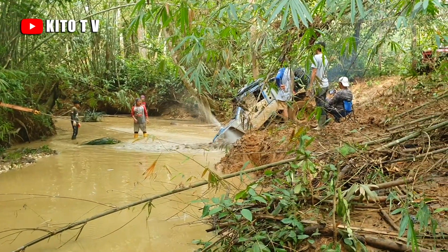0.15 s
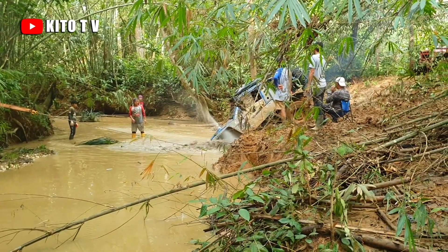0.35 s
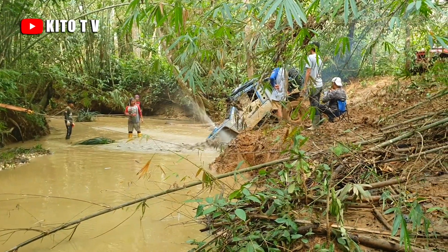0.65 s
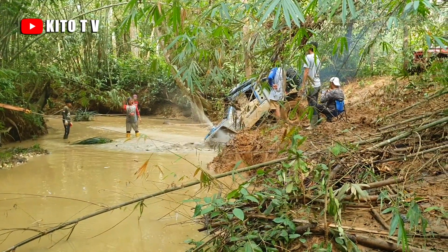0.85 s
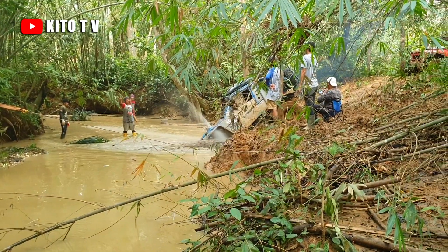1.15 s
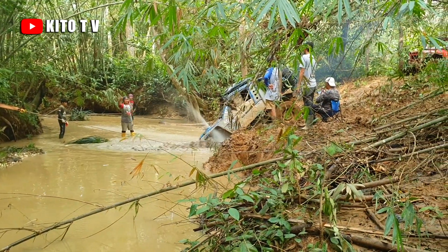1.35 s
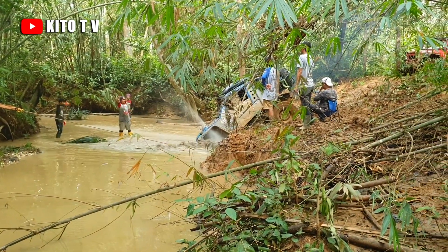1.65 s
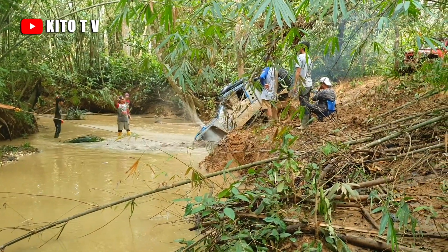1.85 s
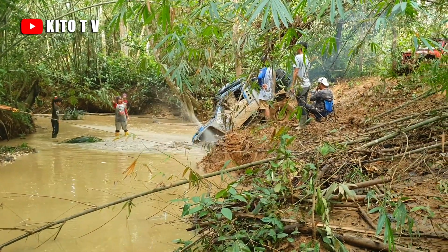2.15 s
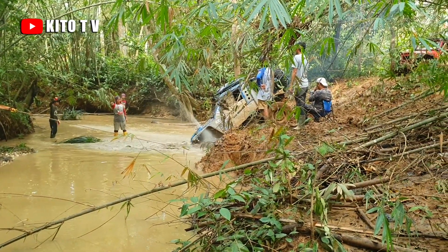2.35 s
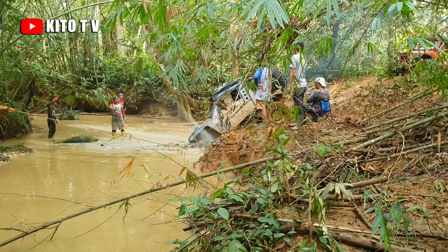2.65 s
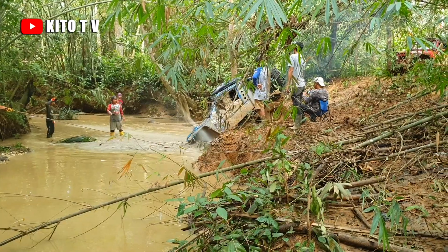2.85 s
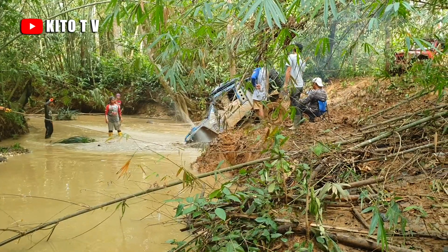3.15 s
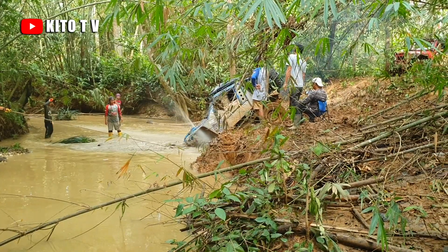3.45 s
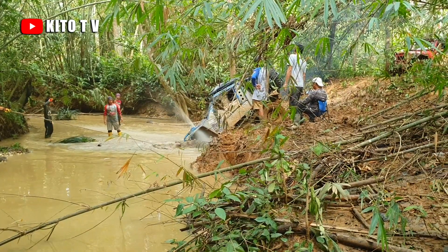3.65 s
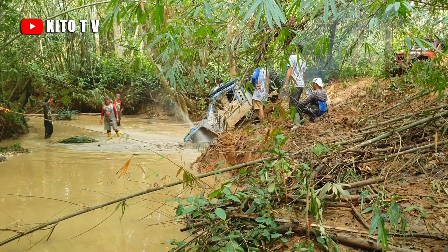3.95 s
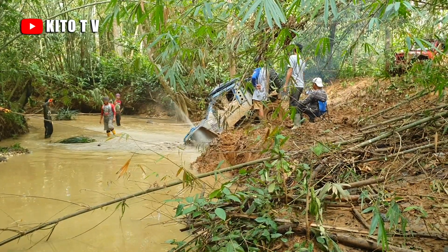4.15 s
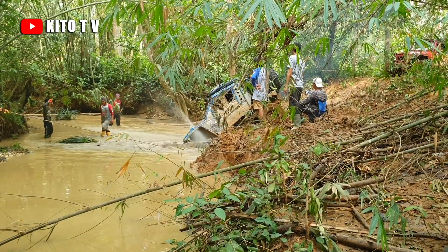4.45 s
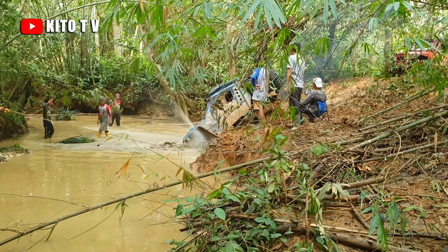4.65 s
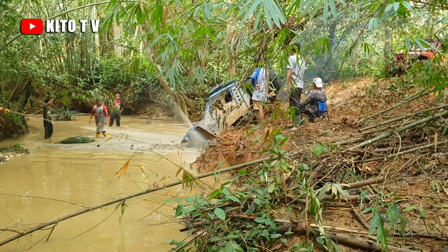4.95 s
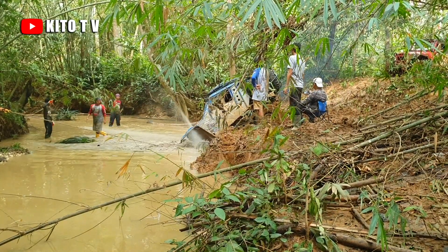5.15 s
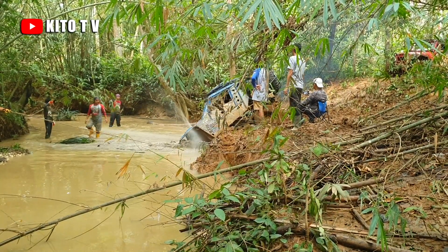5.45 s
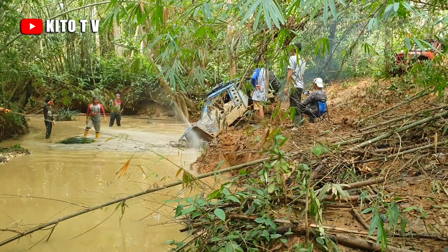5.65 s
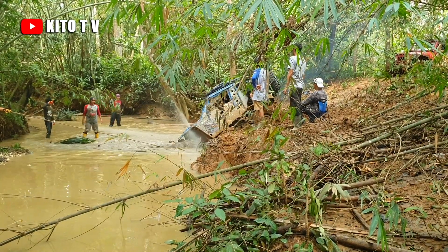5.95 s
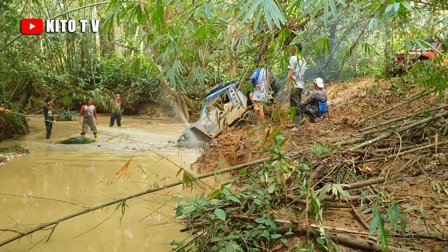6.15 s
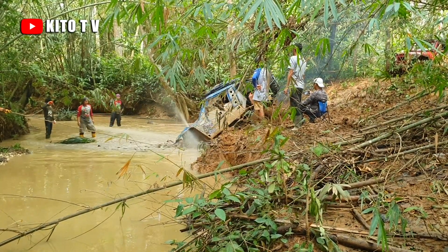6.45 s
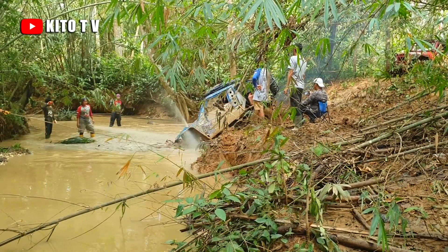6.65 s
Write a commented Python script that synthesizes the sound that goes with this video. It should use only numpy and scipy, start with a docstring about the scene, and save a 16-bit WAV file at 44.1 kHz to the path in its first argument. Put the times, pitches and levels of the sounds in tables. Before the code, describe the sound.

An off-road truck labours on a muddy bank about twenty metres from a stereo microphone. Its deep exhaust drone starts high, sags to a lumpy, weaker low, then surges back under throttle, dips again and finally climbs. Rough gas and intake roar accompanies it, with wheel-thrown water hissing and ticking, and thin steady insect buzz in the forest.

```python
"""Off-road truck climbing a muddy river bank

A four-cylinder truck labours up the bank in a forest, some twenty metres from a stereo camera.
The exhaust booms in clean orders (multiples) of the firing rate; uneven cylinders add quarter and half orders.
Gas and intake noise roars with the throttle, churned water hisses and ticks as it sprays back into the river,
and a steady band of noise makes the insect buzz behind it all."""
import sys
import numpy as np
from scipy import signal
from scipy.fft import rfft, irfft
from scipy.io import wavfile
from scipy.ndimage import uniform_filter1d

SR = 44100
rng = np.random.default_rng(int(sys.argv[2]) if len(sys.argv) > 2 else 0)


def wrap_up_sound(samples):
    """Save the sound to the file named by the first command line argument, as 16-bit audio."""
    columns = np.atleast_2d(samples).T
    # keep every value between -1 and 1, then stretch to whole-number steps
    tamed = np.clip(columns, -1, 1)
    steps = np.round(tamed * 32767).astype(np.int16)
    wavfile.write(sys.argv[1], SR, steps)


N = 299880

# A steady pull, from which load and spray are reckoned: first order [dB], roar [dB], firing rate [Hz]
PULL_BOOM_DB, PULL_ROAR_DB, PULL_HZ = -15, -33, 90


def undb(db):
    """Gain of a dB value."""
    return 10 ** (np.asarray(db) / 20)


def colour(table, hz):
    """Value of a (Hz, value) table, straight on a log-frequency axis."""
    f, value = np.transpose(table)
    return np.interp(np.log(hz), np.log(f), value)


def walk(rate):
    """Random levels held 1 / rate s, then slewed by two moving averages; spread near 1."""
    step = 64  # samples per coarse point
    hold = int(SR / step / rate)
    coarse = np.repeat(rng.standard_normal(N // step // hold + 2), hold)
    coarse = uniform_filter1d(uniform_filter1d(coarse, hold), hold)
    return 2.47 * np.interp(np.arange(N), step * np.arange(len(coarse)), coarse)


def ports(mid, side, hz):
    """Left and right microphone ports from mid and side, with width and tilt set by pitch."""
    # Stereo width: (frequency [Hz], side minus mid [dB])
    width = [(60, -21), (110, -22), (200, -24), (380, -13), (700, -7), (1290, -1), (2380, -1), (4400, -1),
             (8120, -1), (15000, 1)]
    # Stereo balance: (frequency [Hz], left minus right [dB])
    tilt = [(60, 1.5), (110, -2), (200, 0), (380, 2), (700, -1.5), (1290, 0.5), (2380, -0.5), (4400, -3.5),
            (8120, -2.5), (15000, -0.5)]
    sign = np.array([[1], [-1]])
    spread = mid + sign * undb(colour(width, hz)) * side
    return spread * undb(sign * colour(tilt, hz) / 2)


def noise(table, ref_hz, swell_db, flicker_db):
    """Half-octave bands of wide noise that swell together and flicker alone; 0 dB over the reference range."""
    f = np.maximum(np.fft.rfftfreq(N, 1 / SR), 1)
    shape = undb(colour(table, f))
    in_reference = (f > ref_hz[0]) & (f < ref_hz[1])
    shape = shape / np.sqrt(np.sum(shape[in_reference] ** 2) * 2 / N)
    mid, side = rfft(rng.standard_normal((2, N))) * shape
    out, swell = 0, swell_db * walk(7)
    low, high = np.log2([table[0][0], table[-1][0]])
    for octave in np.arange(low - 1, high + .5, .5):
        # neighbouring bands cross-fade and add up to one
        share = np.cos(np.pi * np.clip(np.log2(f) - octave, -.5, .5)) ** 2
        band = ports(irfft(mid * share, N), irfft(side * share, N), 2 ** octave)
        out = out + band * undb(swell + flicker_db * walk(6.3))
    return out


def insects():
    """Forest buzz: many small voices merge into a steady narrow band of noise."""
    # Buzz spectrum: (frequency [Hz], relative density [dB per Hz])
    buzz = [(2300, -30), (2550, 9), (2800, 1), (3150, -12), (3500, -39)]
    return undb(-52.5) * noise(buzz, (2300, 3500), swell_db=0.5, flicker_db=0.1)


def spray(hz, throttle):
    """Water thrown by the wheels: a hiss with fine drops on top, more under load and at low revs."""
    # Water hiss: (frequency [Hz], relative density [dB per Hz])
    hiss_spectrum = [(300, -12), (1000, 1.5), (1900, -4), (2800, 2.5), (4000, -3.5), (6500, -4.5),
                     (8000, -12), (12000, -12), (15500, -22.5)]
    level_db = -40 + 0.47 * throttle - 0.13 * (hz - PULL_HZ)
    hiss = noise(hiss_spectrum, (1200, 12000), swell_db=0.42, flicker_db=1.1)
    falls = rng.random((2, N)) < 300 / SR  # about 300 drops a second at each port
    drops = falls * undb(np.minimum(3.5 * rng.exponential(size=(2, N)), 12))
    drop_band = signal.butter(2, [6000, 15500], "bandpass", fs=SR, output="sos")
    ticks = signal.sosfilt(drop_band, drops)
    return undb(level_db) * (hiss + undb(8.5) * ticks)


def roar(cycle, db):
    """Gas and intake noise, puffing faintly once a firing and with a slower puff every other firing."""
    # Gas and intake noise: (frequency [Hz], relative density [dB per Hz])
    gas = [(30, -1), (60, 11), (100, 14), (200, 5), (350, 5.5), (520, 5.5), (750, 3), (950, 2), (1200, 0),
           (1700, -0.5), (2200, -5), (4500, -10.5), (7000, -17.5), (15000, -31)]
    puff = 1 + .12 * np.cos(cycle) + .09 * np.cos(cycle / 2)
    return undb(db) * puff * noise(gas, (500, 2400), swell_db=0.1, flicker_db=0.36)


def silencer_db(hz):
    """What the silencer lets through above the first order, with its peaks and notches."""
    # Silencer response: (frequency [Hz], gain [dB])
    response = [(114, -14), (128, 2.5), (138, 7.5), (150, -5), (162, -5), (171, 1.5), (181, 0.5),
                (190, -4.5), (199, -7.5), (208, 1), (216, 6.5), (225, -0.5), (233, 2), (242, -14), (251, 1),
                (260, 2.5), (266, -4), (268.6, -14.5), (271.5, -4), (284, -5.5), (300, 5), (315, 5),
                (332, -3.5), (348, 1.5), (362, -3), (374, 1), (385, -4), (400, 1), (416, -2), (432, -4.5),
                (450, 2.5), (473, -10.5), (520, -24)]
    return colour(response, hz)


def order(k, cycle, hz, db, waver, far_db, rate=9):
    """One engine order; it reaches the two ports a little apart in time, by a lag that drifts."""
    # Lean of each exhaust pulse, which flips as the firing rate passes a pipe mode:
    # (firing rate [Hz], phase [rad])
    skew = [(76, .2), (86, .5), (90, 1.0), (94, .8), (98, -.3), (103, -.85)]
    angle = k * cycle + np.pi + colour(skew, hz) + waver * walk(rate)
    apart = undb(far_db) * np.sin(angle + 0.25 * k * walk(1.124))
    return np.sqrt(2) * undb(db) * ports(np.cos(angle), apart, k * np.mean(hz))


def upper_orders(hz, boom, throttle, rise):
    """Levels of orders 2 to 5, which follow boom, throttle and rising revs through the silencer."""
    # Upper orders: (order, level on a steady pull before the silencer [dB], per first order [dB per dB],
    # per throttle [dB per dB], per rising revs [dB per Hz/s])
    upper = [(2, -19, 1.28, 0.4, 0.0436), (3, -29, 0.17, 0.33, 0.0972), (4, -32.5, 0.37, 0.4, 0.257),
             (5, -40, 0.6, 1.3, 0.0731)]
    # An order briefly fades or swells: (time [s], order, half length [s], change [dB])
    fades = [(0.664, 4, 0.13, -10), (1.72, 4, .08, -9), (2.33, 2, 0.079, -14), (2.34, 4, 0.11, -17),
             (2.42, 3, 0.047, -6), (3.0, 4, 0.072, -6), (3.621, 5, .12, -11), (4.797, 4, 0.14, -3),
             (5.55, 5, 0.22, -5), (5.6, 4, .08, -7), (5.9, 4, .05, -7), (6.13, 4, 0.11, 6)]
    t = np.arange(N) / SR
    levels = []
    for k, db, per_boom, per_throttle, per_rise in upper:
        level = db + per_boom * boom + per_throttle * throttle + per_rise * rise
        for at, which, half, change in fades:
            if round(which) == round(k):
                level = level + change * np.exp(-((t - at) / half) ** 2)
        levels.append(level + silencer_db(round(k) * hz))
    return levels


def exhaust(cycle, hz, main_db, quarter_db, half_db, ring_db):
    """Clean firing orders, the lope of unequal cylinders, and high orders that sound where they meet a pipe mode."""
    # Quarter orders: (order, level over the lope [dB])
    quarters = [(.25, -27), (.75, -5), (1.25, -4.5), (1.75, -30), (2.25, -5), (2.75, -11.5), (3.25, -11.5),
                (3.75, -9)]
    # Half orders: (order, level over their drive, before the silencer [dB])
    halves = [(.5, -18), (1.5, -4), (2.5, -3), (3.5, -12), (4.5, -12), (5.5, -10)]
    # Upper exhaust modes: (frequency [Hz], width [Hz], level over the drive [dB])
    pipe = [(525.8, 16.1, -10), (586.9, 37, -6.5), (718, 34, -6), (779, 49, -18), (851, 20, -9),
            (1136, 180, -11.5), (1424, 120, -14)]
    out = 0
    for k, db in enumerate(main_db, start=1):
        out = out + order(k, cycle, hz, db + .25 * k * walk(14), .045 * k, -3.)
    for k, db in quarters:
        out = out + order(k, cycle, hz, quarter_db + db + 2.5 * walk(8), 1.1, -2)
    for k, db in halves:
        level = half_db + db + silencer_db(k * hz) + 1.3 * walk(6)
        out = out + order(k, cycle, hz, level, .6, 8.)
    for k in range(6, 18):
        ring = sum(undb(db) / (1 + (2 * (k * hz - f) / w) ** 2) for f, w, db in pipe)
        smear = (k / 14) ** 2  # firing jitter blurs the highest orders into rasp
        out = out + ring * order(k, cycle, hz, ring_db + 2 * walk(14), smear, -4., rate=2 * k)
    return out


def scene():
    """Forest, water and engine as they reach the two microphone ports."""
    # The climb: (time [s], firing rate [Hz], first order [dB], roar of the open throttle [dB])
    climb = [(0.0, 104.5, -15.5, -33), (0.45, 103.4, -13.5, -33), (0.95, 102.3, -12.5, -33),
             (1.14, 99.0, -16, -35.5), (1.3, 97.4, -12.5, -35.5), (1.48, 98.3, -12, -33),
             (1.7, 96.05, -16, -35.5), (1.84, 93.6, -15.5, -36), (2.0, 90.68, -20, -37.5),
             (2.18, 85.86, -21.5, -36.5), (2.45, 78.97, -25, -37.5), (2.62, 75.8, -21.5, -38),
             (2.74, 77.21, -20, -36.5), (2.85, 80.7, -19.5, -32), (3.05, 86.0, -17.5, -30),
             (3.3, 91.55, -13.5, -30.5), (3.48, 90.8, -16, -33), (3.74, 87.3, -19, -33),
             (3.95, 86.1, -18, -32.5), (4.22, 88.6, -14, -31), (4.56, 90.4, -14.5, -31),
             (4.85, 89.97, -13, -32.5), (5.1, 88.3, -15, -31.5), (5.55, 86.43, -16.5, -33),
             (6.0, 89.6, -13.5, -31), (6.32, 93.1, -12.5, -31.5), (6.8, 94.2, -12, -33.5)]
    time, *columns = np.transpose(climb)
    t = np.arange(N) / SR
    hz, first_db, roar_db = (np.interp(t, time, column) for column in columns)
    # dB over a steady pull
    boom, throttle = first_db - PULL_BOOM_DB, roar_db - PULL_ROAR_DB
    # rising revs in Hz/s, averaged over 0.19 s
    rise = uniform_filter1d(np.gradient(hz) * SR, int(0.19 * SR))
    cycle = 2 * np.pi * np.cumsum(hz) / SR  # firing phase, radians

    main_db = [first_db, *upper_orders(hz, boom, throttle, rise)]
    quarter_db = -40 - 1.18 * boom  # the lope grows as the engine bogs down
    half_db = -38.5 - 0.83 * boom + 0.79 * throttle
    ring_db = roar_db - 3 + 0.064 * rise  # drive of the pipe modes
    engine = exhaust(cycle, hz, main_db, quarter_db, half_db, ring_db) + roar(cycle, roar_db)
    return insects() + spray(hz, throttle) + engine


def record(dry):
    """The camera cuts the top of the band, steeply above 15680 Hz."""
    return signal.sosfilt(signal.ellip(10, .2, 70, 15680, fs=SR, output="sos"), dry)


dry = scene()
out = record(dry)
wrap_up_sound(out)
```